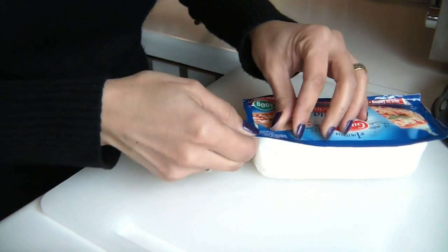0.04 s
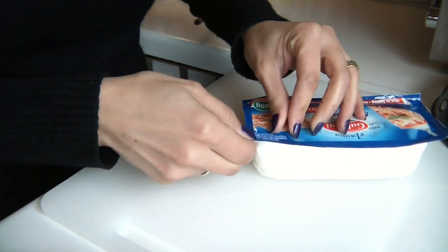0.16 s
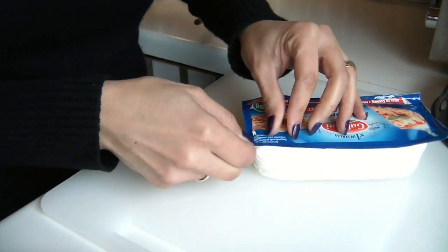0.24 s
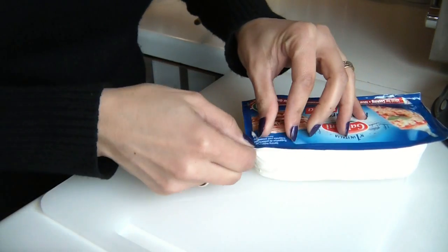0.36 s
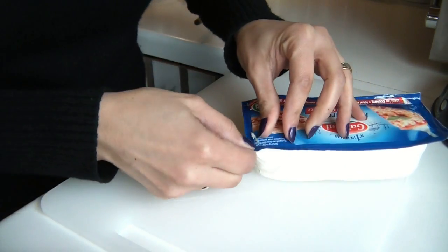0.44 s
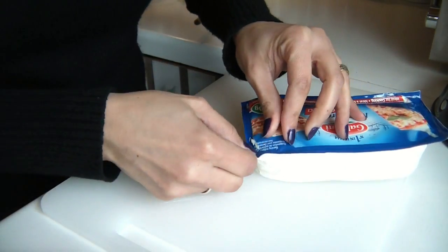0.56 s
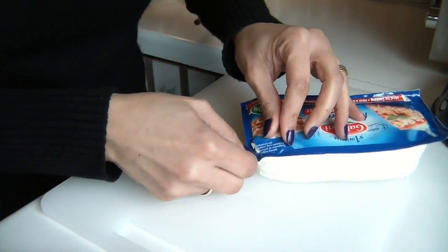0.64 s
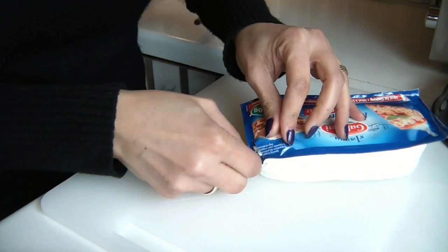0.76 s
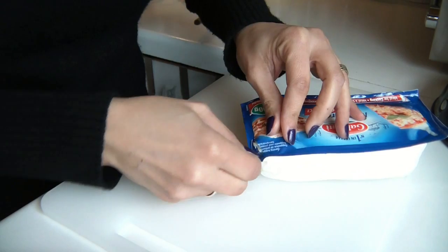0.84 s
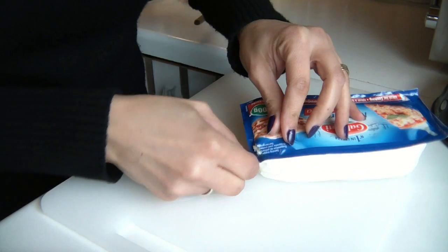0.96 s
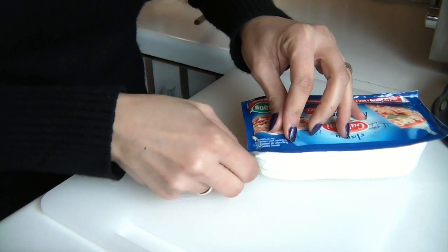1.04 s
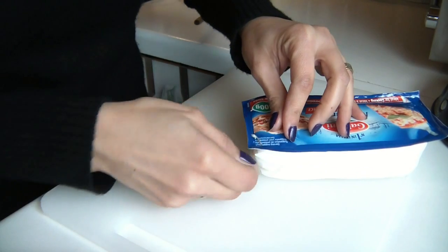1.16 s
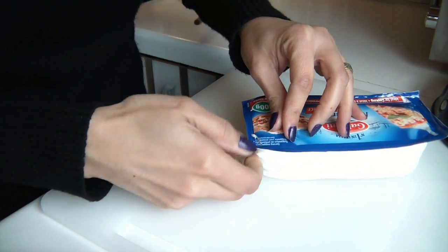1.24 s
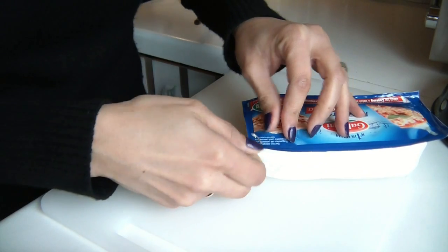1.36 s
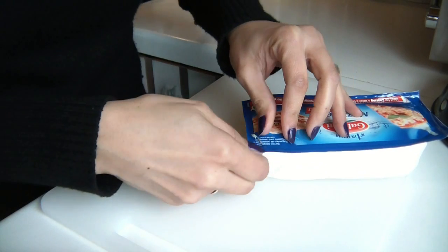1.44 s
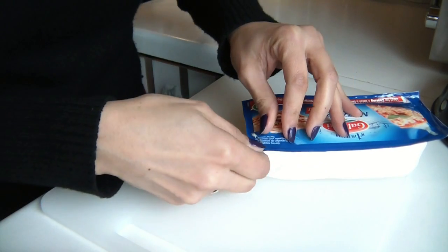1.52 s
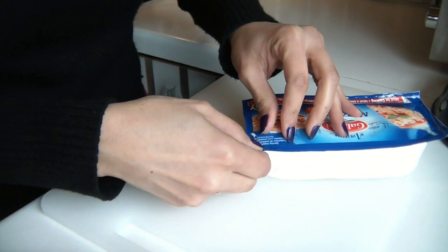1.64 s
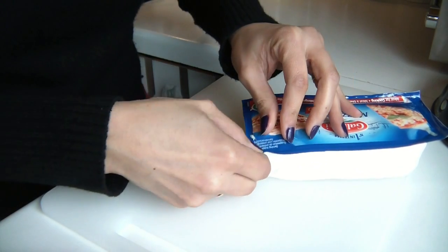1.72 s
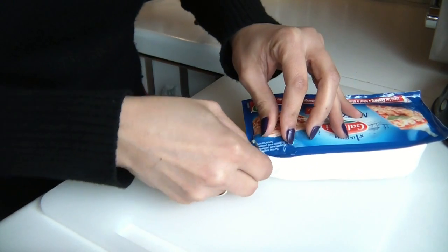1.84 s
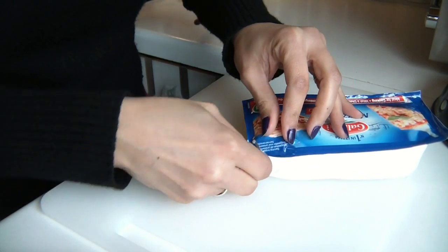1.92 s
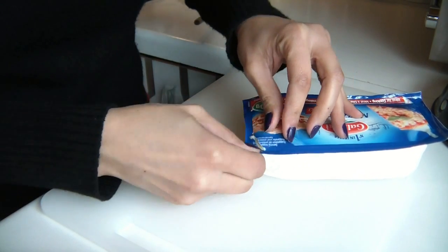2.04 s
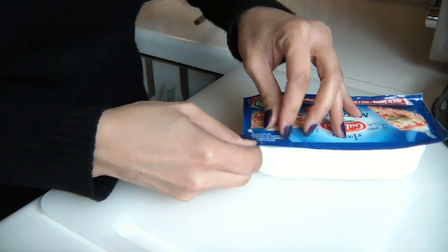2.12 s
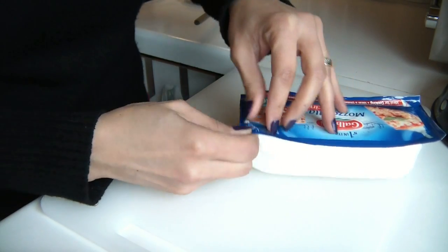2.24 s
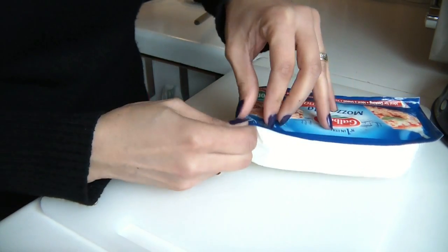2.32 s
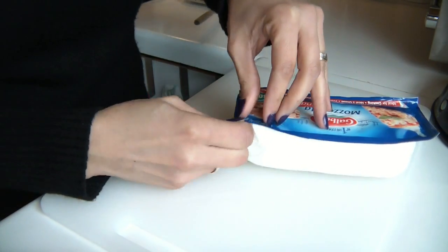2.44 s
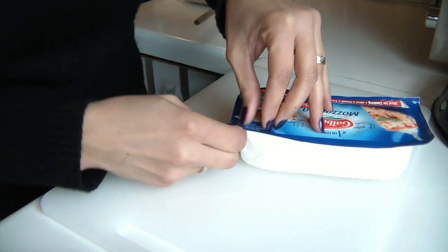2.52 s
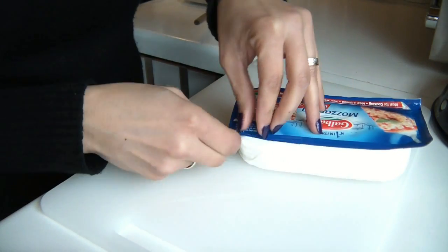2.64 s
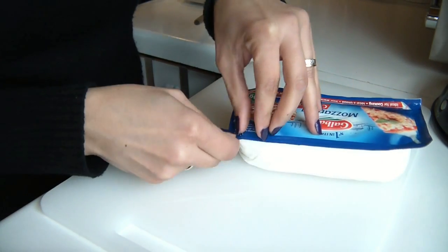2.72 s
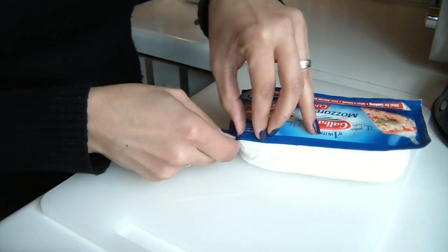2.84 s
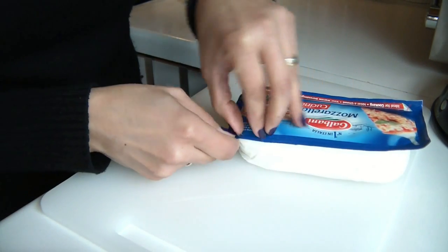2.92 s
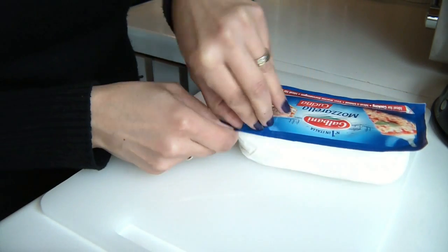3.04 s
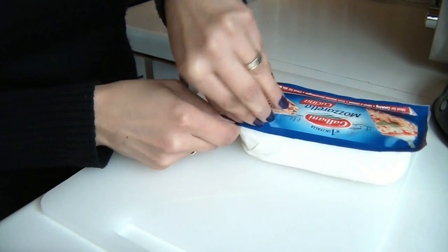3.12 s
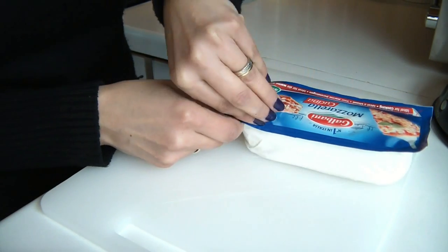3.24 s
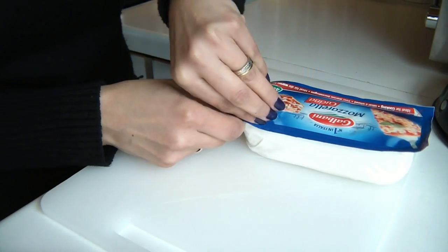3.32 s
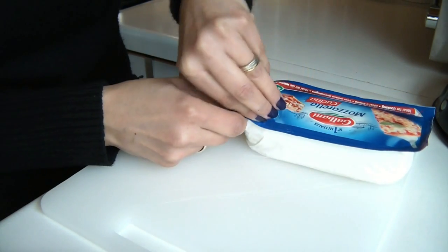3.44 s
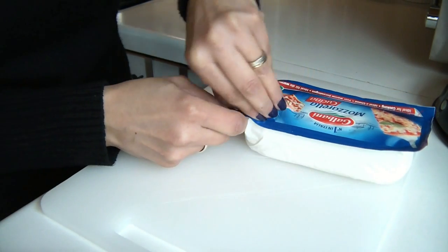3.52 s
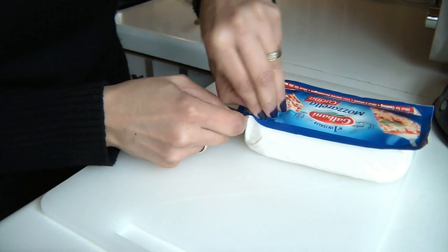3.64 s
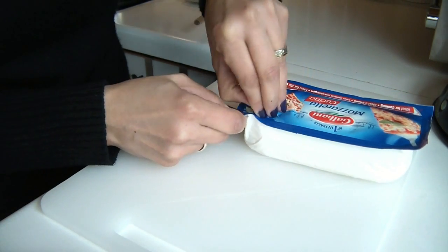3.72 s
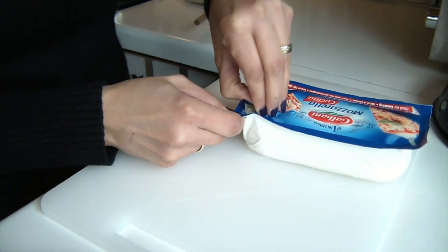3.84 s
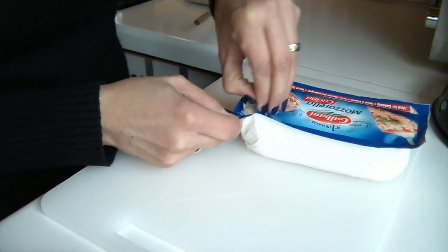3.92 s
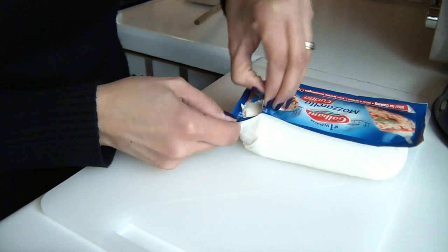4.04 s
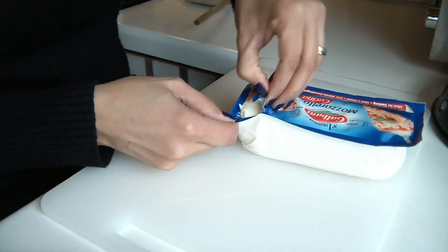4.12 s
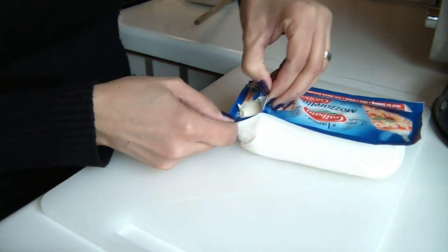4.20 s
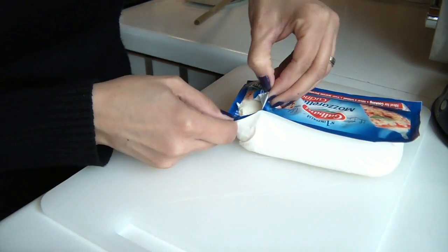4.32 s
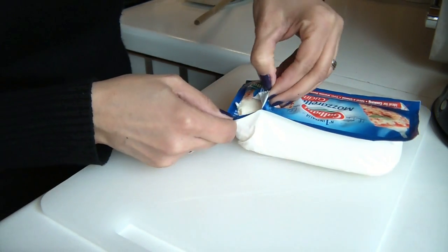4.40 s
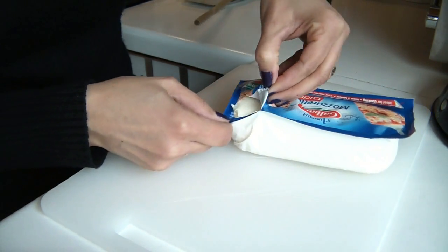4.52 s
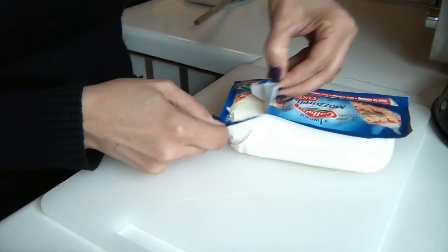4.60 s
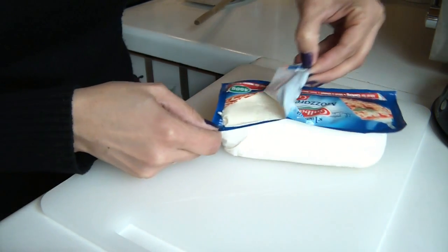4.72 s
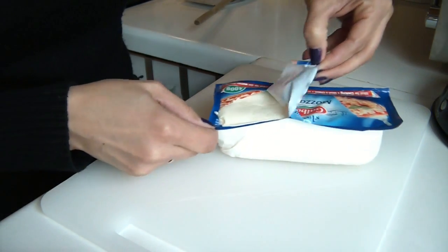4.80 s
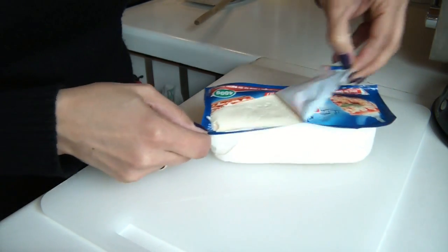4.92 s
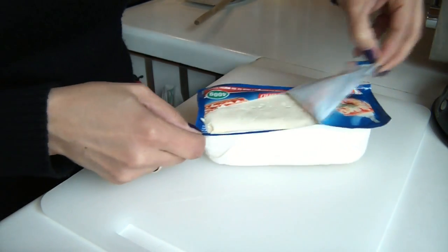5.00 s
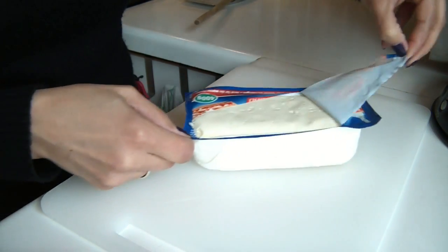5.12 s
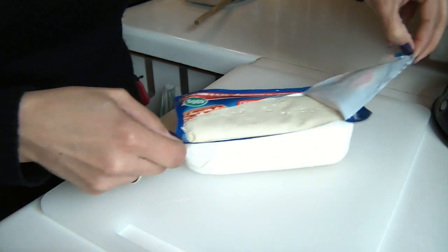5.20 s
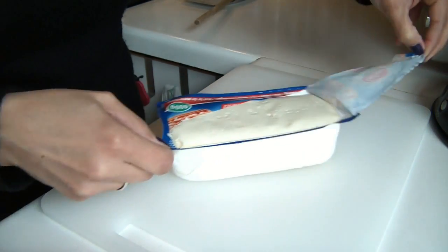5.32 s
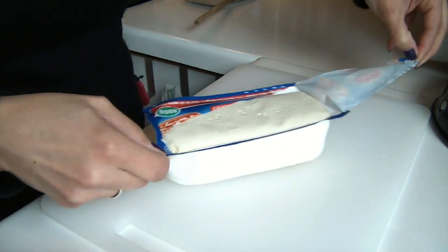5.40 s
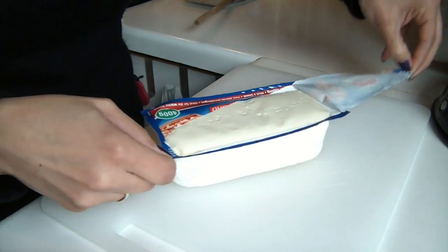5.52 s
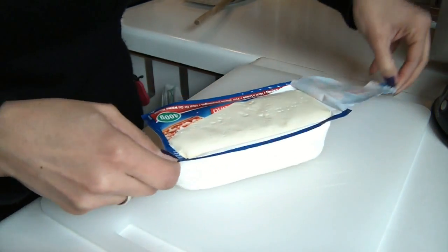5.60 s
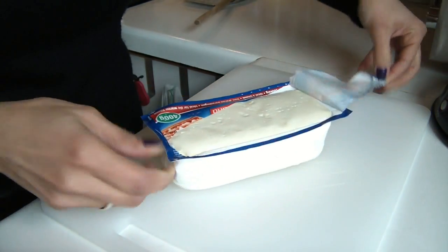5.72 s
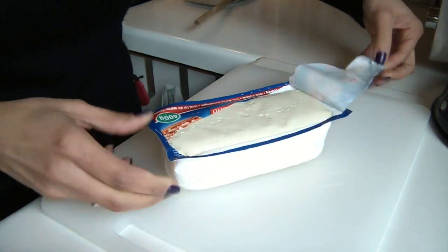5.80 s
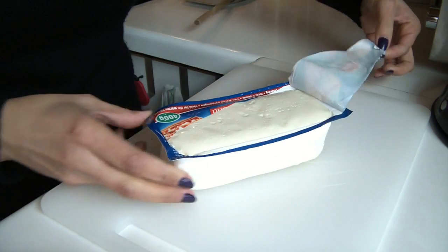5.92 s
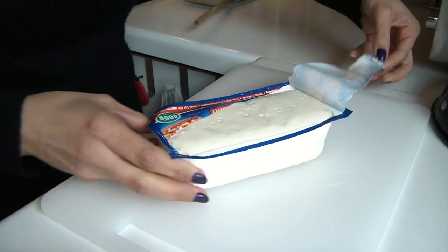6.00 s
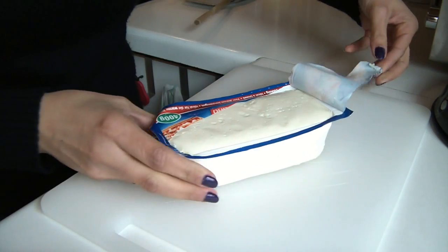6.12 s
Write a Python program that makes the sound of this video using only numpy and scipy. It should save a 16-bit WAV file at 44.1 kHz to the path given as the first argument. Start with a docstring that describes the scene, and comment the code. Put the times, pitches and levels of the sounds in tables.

```python
"""A film lid buckles in single snaps as fingers pick at the corner of a plastic tub, then peel it back.
Each snap is an impulse into crease, lid and tub; the seal tears, and strokes scrape, in runs of tiny slips.
Short damped modes give some of them a pitched ring; soft low thuds and puffs come from the tub.
Close by in a small kitchen, worktop and walls answer as echoes and a noise tail; the hardest snaps
overload the microphone. Room tone, hiss and a faint electrical hum and whine lie beneath."""
import sys
import numpy as np
from scipy import signal
from scipy.fft import rfft, irfft
from scipy.io import wavfile

SR = 44100
rng = np.random.default_rng(int(sys.argv[2]) if len(sys.argv) > 2 else 0)


def transcribe(signal):
    """Save signal, clipped to [-1, 1], as a 16-bit WAV file at the path in sys.argv[1]."""
    frames = np.atleast_2d(signal).T
    limited = np.clip(frames, -1, 1)
    pcm = np.round(limited * 32767).astype(np.int16)
    wavfile.write(sys.argv[1], SR, pcm)


N = 271435  # samples in the scene
SIZE = 16384  # samples in one response
HZ = np.fft.rfftfreq(SIZE, 1 / SR) + 1  # offset keeps divisions and logs finite
T = np.arange(SIZE) / SR


def amp(db):
    """Decibels to gain."""
    return 10 ** (np.asarray(db) / 20)


def unit(x):
    """Scales a sound to energy 1."""
    return x / np.sqrt(np.sum(x ** 2) + 1e-20)


def read(points, hz):
    """Interpolates a (Hz, value) curve on a log-frequency axis."""
    point_hz, value = np.transpose(points)
    return np.interp(np.log(hz + 1), np.log(point_hz), value)


def add(mix, start_s, sound):
    """Mixes a sound in at start_s, cut at the end of the scene."""
    part = mix[:, max(round(start_s * SR), 0):][:, :sound.shape[-1]]
    part += sound[..., :part.shape[1]]


def mode(hz, t60_s):
    """Dying sine of energy 1."""
    return unit(np.sin(2 * np.pi * hz * T) * amp(-60 * T / t60_s))


def burst(t60_s, start_s=0.0):
    """Dying noise of energy 1, silent before start_s."""
    return unit(rng.standard_normal(SIZE) * amp(-60 * T / t60_s) * (T >= start_s))


def hump(hz, q):
    """Power response of one broad resonance, mean 1."""
    power = 1 / (1 + (q * (HZ / hz - hz / HZ)) ** 2) ** 2
    return power / power.mean()


def hush():
    """Steady room tone and microphone hiss, with a faint electrical hum and whine that waver in phase."""
    # Each row: frequency in Hz, relative noise density in dB per Hz.
    noise_curve = [(15, -25), (25, -9), (75, -3.5), (110, -5.5), (170, -5.5), (215, -13.5), (270, -11),
                   (373, -18.5), (462, -13), (1050, -12), (1300, -17.5), (2800, -22), (11800, -23),
                   (15000, -24)]
    # Each row: frequency in Hz, left-right likeness from 0 to 1.
    likeness = [(60, 0.97), (300, 0.78), (1000, 0.65), (3000, 0.52), (7000, 0.1), (15000, 0.025)]
    # Each row: frequency in Hz, level in dB rms.
    tones = [(48.4, -59), (9001, -77), (12209, -68.5), (13264, -77)]
    noise_db_rms = -47
    hz, t = np.fft.rfftfreq(N, 1 / SR), np.arange(N) / SR
    same = np.clip(read(likeness, hz), 0, 1)
    shared, left, right = rfft(rng.standard_normal((3, N)))
    stereo = np.sqrt(same) * shared + np.sqrt(1 - same) * np.array([left, right])
    noise = irfft(stereo * amp(read(noise_curve, hz)), N)
    out = amp(noise_db_rms) * noise / noise.std()
    for tone_hz, db in tones:
        drift = np.cumsum(rng.standard_normal(N))
        phase = 2 * np.pi * tone_hz * t + 0.00026 * np.sqrt(tone_hz) * drift
        out = out + amp(db) * np.sqrt(2) * np.sin(phase)
    return out


def reflections(early_t60_s=0.063, early_gain=1.0, tail_gain=0.7):
    """Scatter from hands and worktop, then the kitchen's tail, each band dying at its own speed."""
    # Each row: band centre in Hz, t60 in s.
    bands = [(250, 0.62), (700, 0.3), (1800, 0.34), (4600, 0.33), (8000, 0.36), (13000, 0.25)]
    noise = rfft(rng.standard_normal(SIZE) * (T > 0.006))
    centres_hz, t60s_s = np.transpose(bands)
    tail = 0
    for pick, t60_s in zip(np.eye(len(centres_hz)), t60s_s):
        share = np.interp(np.log(HZ), np.log(centres_hz), pick)  # crossfades between bands
        tail = tail + irfft(noise * share) * amp(-60 * T / t60_s)
    return early_gain * burst(early_t60_s, start_s=0.0027) + tail_gain * unit(tail)


def path(room_db, flutter=0.6, flutter_t60_s=0.008, dull_hz=10500):
    """Left and right spectra of the way to the microphone: the film's brief flutter, first echoes, the room."""
    # Worktop and nearby surfaces. Each row: nominal delay in s, gain relative to the scatter.
    echoes = [(.0047, 0.79), (.0058, 0.1), (.0066, 0.13), (0.0096, 0.18)]
    # Width of direct sound. Each row: frequency in Hz, side against mid in dB.
    near_width = [(300, -41), (2000, -21), (5000, -12), (7200, -11), (10000, -10), (14000, -6.5)]
    # Width of reflected sound. Each row: frequency in Hz, side against mid in dB.
    far_width = [(300, -40), (2000, -22), (5000, -10.5), (7200, -5.5), (10000, -5.5), (14000, 0)]
    direct = flutter * burst(flutter_t60_s, start_s=0.00042)
    direct[0] += 1
    far = reflections()
    for delay_s, gain in echoes:
        jittered_s = abs(delay_s * (1 + 0.025 * rng.standard_normal()))
        far[int(jittered_s * SR)] += gain
    near_side, far_side = amp(read(near_width, HZ)), amp(read(far_width, HZ))
    signs = np.array([[1], [-1]])
    near = rfft(unit(direct)) + signs * near_side * rfft(burst(0.007))
    near = near / np.hypot(1, near_side)
    room = rfft(unit(far)) + signs * far_side * rfft(reflections())
    room = room / np.hypot(1, far_side)
    return near + amp(room_db) * room / np.hypot(1, (HZ / dull_hz) ** 2)  # top treble hardly comes back


def bumps(rattle=0.44, rise_s=0.00043, t60_s=0.069):
    """Soft low thuds and puffs from the tub: a quickly damped mode and band noise."""
    # Each row: start in s, peak level in dB, pitch in Hz.
    hits = [(0.253, -37, 167), (1.224, -33, 106), (1.225, -38, 267), (1.983, -36.5, 280), (2.718, -40, 214),
            (4.784, -28, 580), (4.887, -25, 555), (5.084, -25, 448), (5.147, -22.5, 273), (5.215, -38, 133),
            (5.515, -43, 282), (5.846, -33, 253), (5.871, -35, 240)]
    out = np.zeros((2, N))
    for start_s, db, hz in hits:
        rumble = unit(irfft(rfft(burst(t60_s)) * np.sqrt(hump(hz, 0.83))))
        envelope = (1 - np.exp(-T / rise_s)) * (T < 0.3)
        thud = (mode(hz, t60_s) + rattle * rumble) * envelope
        add(out, start_s, amp(db) * thud / abs(thud).max())
    return out


def rings(room_db=-6.5):
    """One short damped mode gives a snap or scrape a pitched ring, heard by the kind of path the snaps take."""
    # Each row: start in s, energy before the path in dB, pitch in Hz, t60 in s.
    pitched = [(0.0184, -7.5, 830, 0.021), (0.824, -11.5, 1007, .043), (.966, -17.5, 1043, 0.054),
               (1.223, -6.5, 1230, 0.036), (2.278, -9.5, 2300, 0.0059), (2.461, -6, 2450, 0.0081),
               (2.629, -8, 1680, 0.013), (2.81, .5, 4850, 0.066), (3.69, 7, 10960, 0.0014),
               (4.187, -1, 824, 0.017), (5.099, -8, 477, .043), (5.148, -6, 470, 0.021),
               (5.2166, 13, 2380, 0.015), (5.404, 1, 11000, 0.002)]
    out = np.zeros((2, N))
    for start_s, db, hz, t60_s in pitched:
        add(out, start_s, amp(db) * irfft(rfft(mode(hz, t60_s)) * path(room_db, flutter=0.15)))
    return out


def opening(s):
    """Held fingers shake the tub less than the lid; its hollow's pitch ends lower as the lid comes off."""
    # Each row: time in s, tub against lid in dB, pitch of the hollow in Hz.
    stages = [(.1, -8, 828), (2.3, -14, 840), (4.19, -10.5, 887), (4.85, -7.5, 643), (4.95, -4, 503),
              (5.14, -6, 470), (5.5, -27, 298)]
    times_s, tub_db, hollow_hz = np.transpose(stages)
    return np.interp(s, times_s, tub_db), np.interp(s, times_s, hollow_hz)


def package(s, pitch_hz, tub_db, lid_db, crack_db):
    """Causal response of crease, tub wall, lid and the film's sharp crack to one slip at time s."""
    # Colour that the tub's hollow and the microphone give to every slip. Each row: frequency in Hz, gain in dB.
    colour = [(150, -0.5), (300, -6), (450, 1.5), (660, -0.5), (850, 1), (1100, -2.5), (3000, 0.5),
              (5600, 0), (8400, -1), (11000, 0.5), (14500, -5.5)]
    power = hump(pitch_hz, q=1.7)
    power = power + amp(tub_db) ** 2 * hump(opening(s)[1], q=0.66)
    power = power + amp(lid_db) ** 2 * hump(1700, q=0.78)
    power = power + amp(crack_db) ** 2 * hump(9300, q=0.45)
    log_gain = np.log(power * amp(read(colour, HZ)) ** 2 + 1e-7) / 2
    # minimum phase: the Hilbert transform of log gain gives the phase
    circle = np.concatenate([log_gain, log_gain[-2:0:-1]])
    return np.exp(np.conj(signal.hilbert(circle)))[:len(HZ)]


def slips(length, rate_per_s, surge_db, spread_db=4.0, surge_hz=70, count=300):
    """Tension builds and lets go at uneven gaps; the slips come in surges, many small and a few large."""
    gaps = rng.gamma(4, 0.25, count)  # mean 1
    at = (np.cumsum(gaps) / rate_per_s * SR).astype(int)
    surge = np.interp(at / SR * surge_hz, np.arange(count), rng.standard_normal(count))
    size_db = spread_db * np.minimum(rng.exponential(1, count), 3) + surge_db * surge
    sizes = amp(size_db) * rng.choice([-1, 1], count)
    inside = at < length
    return np.bincount(at[inside], sizes[inside], length)


def crackle(start_s, end_s, rate_per_s, swell_db, pitch_hz, tub_db, lid_db, crack_db,
            room_db, surge_db, fade=0.09):
    """Stick and slip: a run of tiny impulses, ramped between two levels, is shared among spots of the film."""
    length = int(np.clip((end_s - start_s) * SR, 200, SIZE))
    run = unit(slips(length, rate_per_s, surge_db) * signal.windows.tukey(length, fade))
    run = run * np.sqrt(length) * amp(np.linspace(*swell_db, length))
    stretches = (0.87, 1, 1.13)  # crease pitch of each spot against pitch_hz
    spot = rng.integers(len(stretches), size=SIZE)[:length]
    middle_s = (start_s + end_s) / 2
    out = 0
    for k, stretch in enumerate(stretches):
        response = package(middle_s, pitch_hz * stretch, tub_db, lid_db, crack_db)
        ring = irfft(response * path(room_db))
        out = out + signal.fftconvolve((run * (spot == k))[None], ring, axes=1)
    return out / np.hypot(1, amp(room_db))


def rubs(level_db=-4.5, room_db=-0.5, surge_db=-0.5):
    """Nails and fingers scrape film and rim: quick strokes slip faster, hard ones sound duller."""
    # Each row: start in s, end in s, level before level_db in dB, middle crease pitch in Hz,
    # body against crease in dB.
    strokes = [(0.374, .388, -37, 4230, 8.5), (0.721, 0.746, -36.5, 5900, -14),
               (0.777, 0.85, -42, 5250, -6.5), (.882, 0.953, -39, 3930, -6), (.944, 0.998, -36, 4200, -6.5),
               (1.01, 1.151, -50.5, 4630, 0), (1.172, 1.203, -40, 3600, -5), (1.213, 1.226, -32, 3780, 0),
               (1.221, 1.236, -23.5, 4340, -1), (1.405, 1.436, -60.5, 4000, 12.5),
               (1.677, 1.713, -50.5, 5470, 1.5), (2.079, 2.268, -47, 4580, -1.5),
               (2.209, 2.228, -57, 4000, 16), (2.3, 2.45, -49.5, 4200, 9), (2.448, 2.467, -26, 4200, -33),
               (2.699, 2.744, -40.5, 3900, 2.5), (2.789, 2.808, -33, 5010, -7.5),
               (3.618, 3.7, -41, 4050, -10), (3.695, 3.746, -31, 5170, -2.5),
               (4.138, 4.181, -39, 4200, -1.5), (5.223, 5.247, -16, 5200, -7.5),
               (5.503, 5.531, -28.5, 4530, -4), (5.526, 5.559, -38, 2360, 3.5),
               (5.566, 5.656, -40, 5000, -3.5), (5.766, 5.809, -48, 5200, -12),
               (5.839, 5.911, -44, 1150, 0.5), (5.939, 5.963, -49.5, 3000, 14),
               (6.082, 6.187, -46.5, 5830, 1.5)]
    slips_per_stroke = 19  # about the same ridges each time: quick strokes buzz, slow ones tick
    crisp_db, crisp_at_db, dulling_db_per_db = 0, -43.5, 0.18  # crack falls with force
    wall_db, wall_growth_db_per_db = -7, 1.43  # bearing on the body reaches the tub wall
    out = np.zeros((2, N))
    for start_s, end_s, db, pitch_hz, body_db in strokes:
        rate_per_s = slips_per_stroke / max(end_s - start_s, 0.005)
        tub_db = wall_db + wall_growth_db_per_db * body_db
        crack_db = crisp_db - dulling_db_per_db * (db - crisp_at_db)
        scrape = crackle(start_s, end_s, rate_per_s, (db, db), pitch_hz, tub_db, body_db, crack_db,
                         room_db, surge_db)
        add(out, start_s, scrape)
    return amp(level_db) * out


def peel(level_db=-4.0, room_db=-2.5, surge_db=3.0):
    """The seal tears in a swelling run of slips during each pull and drums on the opening hollow."""
    # Each row: start in s, end in s, level at start and at end before level_db in dB, tub against crease in dB.
    pulls = [(4.81, 4.967, -36.5, -31, 1.5), (5.061, 5.224, -33.5, -29, -3), (5.401, 5.51, -40, -36, -5.5)]
    tear_per_s, tear_hz, lid_db, crack_db = 340, 3820, -2, -1.5  # dB against the crease
    out = np.zeros((2, N))
    for start_s, end_s, from_db, to_db, tub_db in pulls:
        tear = crackle(start_s, end_s, tear_per_s, (from_db, to_db), tear_hz, tub_db, lid_db, crack_db,
                       room_db, surge_db)
        add(out, start_s, tear)
    return amp(level_db) * out


def patch(pitch_hz, reach_octaves=0.61, t60_s=0.035):
    """Film round one crease rings in the taut film's modes nearest its pitch, at energy 1."""
    # Each row: frequency in Hz, relative level in dB.
    film_modes = [(2229, -40), (2412, -70), (3225, -37), (4221, -59), (4457, -45), (4635, -40), (5340, -38),
                  (5744, -37.5), (5975, -34), (6595, -60), (6864, -36.5), (7192, -39)]
    ringing = 0
    for k, (hz, db) in enumerate(film_modes):
        nearness = np.exp(-(np.log2(hz / pitch_hz) / reach_octaves) ** 2)
        ringing = ringing + (-1) ** k * amp(db) * nearness * mode(hz, t60_s)
    return unit(ringing)


def snaps(level_db=-0.64, room_db=-2.5):
    """Each row is one impulse into the package; its body share moves the lid, rings tub wall and hollow."""
    # Buckles of film and rim; the row at 5.223 s is a loud early echo of the hardest snap.
    # Each row: start in s, energy before level_db in dB, crease pitch in Hz, body against crease in dB,
    # crack against crease in dB.
    impulses = [(0.0187, 3, 4500, -2.5, -38), (0.2604, -21, 5500, -10, 3.5), (0.3626, -3, 4710, -3, -29),
                (.377, 1, 4900, -2.5, -31), (0.5752, -17, 2600, -7.5, 8), (.6832, -7, 5340, -11.5, -8),
                (.7179, -6.5, 5600, -13, -1), (0.7728, -20, 5380, -1, 10), (0.8002, -11.5, 4970, -5.5, 1.5),
                (.992, -19, 4080, -7, 8.5), (1.087, -17.5, 4740, -5, -4), (1.0994, -17, 4700, -6, -4),
                (1.2247, -10, 4600, 9, 6), (1.8946, -20, 3250, 9, -18), (1.9131, -19, 4330, 3.5, -1),
                (1.943, -17.5, 3520, -2, 1), (1.9719, -19, 6170, 8.5, 12.5), (2.1121, -20, 4080, -2, 5),
                (2.1723, -6, 5060, -28, 0.5), (2.279, 0.5, 5700, 1.5, -25), (2.3248, -14, 4700, -16, 11),
                (2.353, -14.5, 3560, -5, 0), (2.402, -22, 3900, -2, 8), (2.4324, -19.5, 4700, 0, 13),
                (2.456, 0.5, 4400, 2.5, -8.5), (2.5294, -12, 4600, 3.5, -5), (2.6288, -10, 5010, -2, -12),
                (2.721, -16, 3630, -5, 3), (2.7464, -16, 6260, -3, -1), (2.8094, 6.5, 4950, -13, 2.5),
                (2.9833, -23, 3400, -1, -3), (3.5693, -15, 5130, -1, 3.5), (3.6395, -20, 3070, 0.5, 7),
                (3.6926, 6, 5130, -13.5, -6), (3.808, -3.5, 5200, -5, -27), (3.854, -17, 5200, -3, -1),
                (4.1158, -10.5, 4480, -4, -14), (4.146, -10, 4020, -17, -16), (4.187, 14.5, 3520, -7, -4.5),
                (4.3906, -15.5, 4160, -1.5, 1), (4.5768, -25, 2740, -22, -19),
                (4.6205, 3.5, 4180, -4.5, -2), (4.7212, -13, 4750, 3, -1.5), (4.7835, -17, 4300, 4.5, 3.5),
                (4.874, -8.5, 5400, -14, -1.5), (4.8861, -6.5, 4100, 5, -18), (4.9182, -10, 2980, 2, -2),
                (4.9492, 13, 4010, -8, -3), (5.1011, -1.5, 3040, 5, -4), (5.1162, -1.5, 4340, -8, -1),
                (5.1206, -1, 2600, -2, -8), (5.1476, 10.5, 4300, 3, -4), (5.2166, 20, 5530, -17, -5),
                (5.223, 16, 4300, -4, -22), (5.2438, 8, 4820, -4, 0.5), (5.2488, 8, 3260, -6, 2.5),
                (5.4, -19, 5070, -1, 13), (5.4176, -9.5, 4640, -2.5, 7.5), (5.4436, -17, 4930, -5, 11),
                (5.461, -7.5, 4200, -8, -2), (5.4713, -12.5, 5260, -3, 1), (5.5156, -1.5, 4560, 7, -18),
                (5.5953, -27, 5310, -1, 2), (5.8427, -36, 2620, 14, -17), (5.8932, -42, 4500, 6, -15),
                (5.9446, -32.5, 4530, 22.5, -26), (6.0602, -31.5, 2880, 12.5, -11)]
    # Each row: frequency in Hz, level against the body in dB, t60 in s.
    wall_modes = [(1790, -23, 0.019), (2380, -21.5, 0.0094)]
    patch_db, hollow_db, hollow_t60_s = -10.5, -4, 0.04  # hollow_db is against the tub
    wall = sum((-1) ** k * amp(db) * mode(hz, t60_s) for k, (hz, db, t60_s) in enumerate(wall_modes))
    out = np.zeros((2, N))
    for start_s, db, pitch_hz, body_db, crack_db in impulses:
        coupling_db, hollow_hz = opening(start_s)
        tub_db = body_db + coupling_db
        ringing = amp(patch_db) * patch(pitch_hz) + amp(body_db) * wall
        ringing = ringing + amp(tub_db + hollow_db) * mode(hollow_hz, hollow_t60_s)
        response = package(start_s, pitch_hz, tub_db, body_db, crack_db) + rfft(ringing)
        add(out, start_s, amp(db + level_db) * irfft(response * path(room_db)))
    return out


def scene():
    """Everything on the worktop, over the hush."""
    return hush() + bumps() + rings() + rubs() + peel() + snaps()


def record(dry, ceiling=0.97, edge_hz=15500):
    """The hardest snaps flatten against the ceiling; then a low-pass limits the band."""
    clipped = dry / (1 + (dry / ceiling) ** 6) ** (1 / 6)
    lowpass = signal.firwin(255, edge_hz, window=("kaiser", 8), fs=SR)
    return signal.oaconvolve(clipped, lowpass[None], "same")


dry = scene()
out = record(dry)
transcribe(out)
```